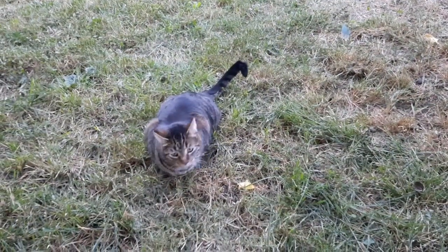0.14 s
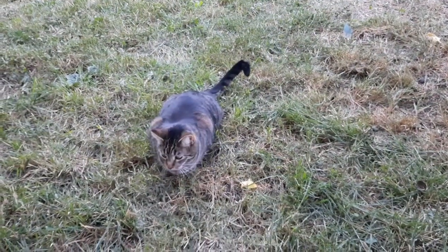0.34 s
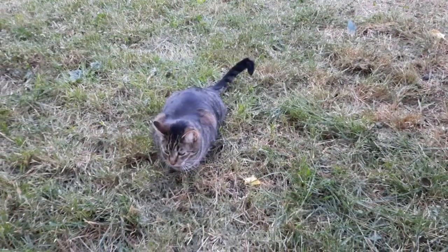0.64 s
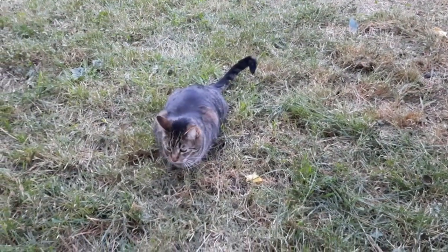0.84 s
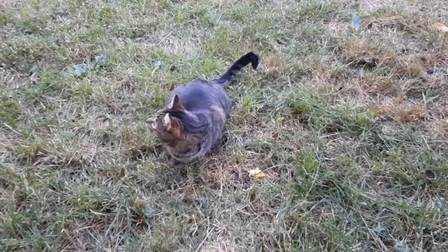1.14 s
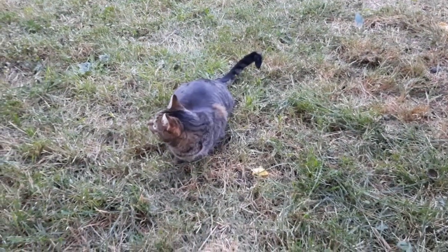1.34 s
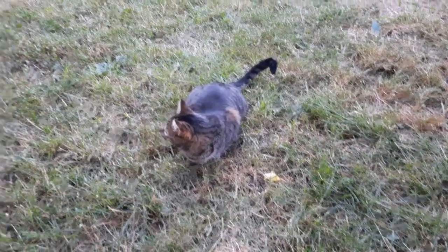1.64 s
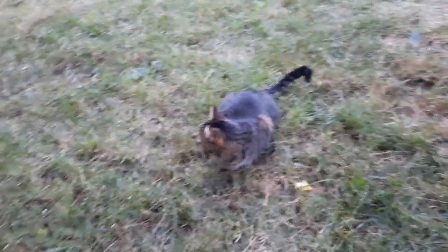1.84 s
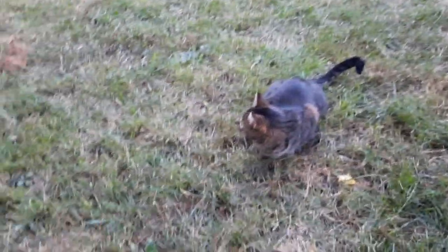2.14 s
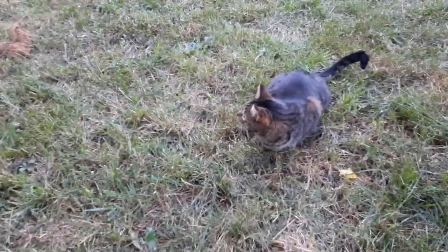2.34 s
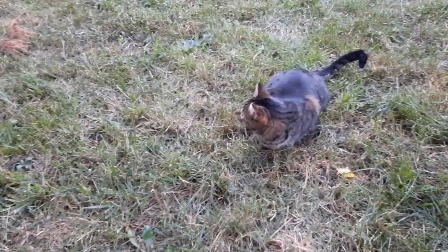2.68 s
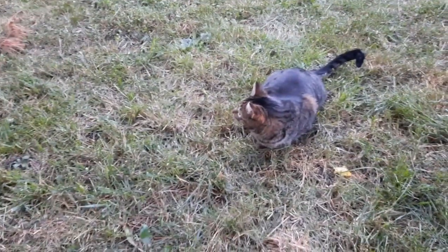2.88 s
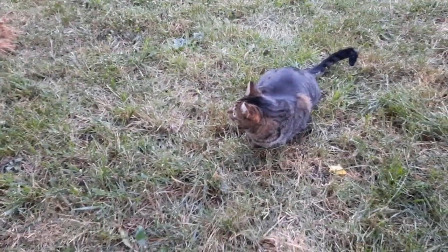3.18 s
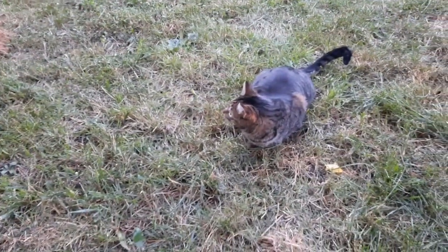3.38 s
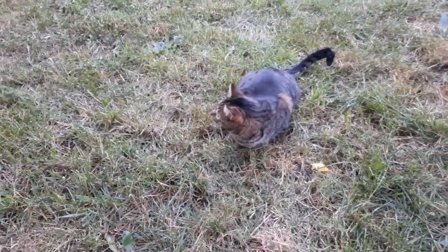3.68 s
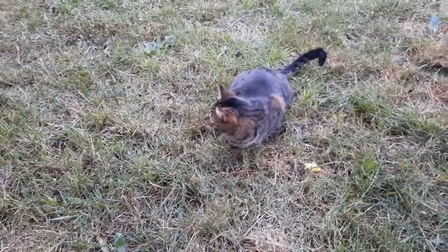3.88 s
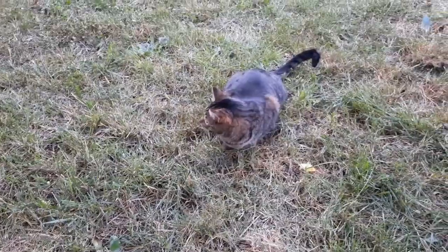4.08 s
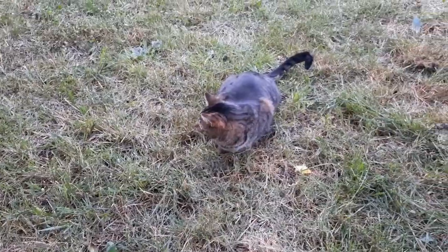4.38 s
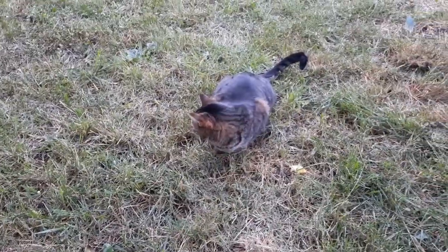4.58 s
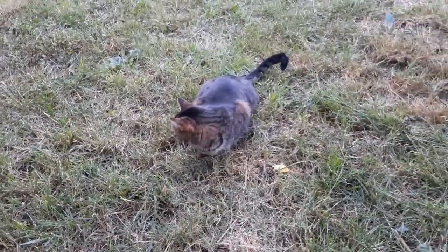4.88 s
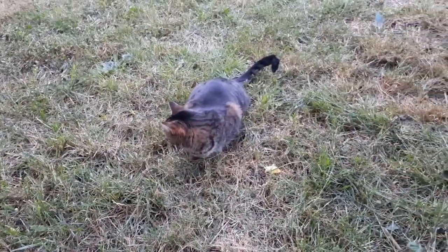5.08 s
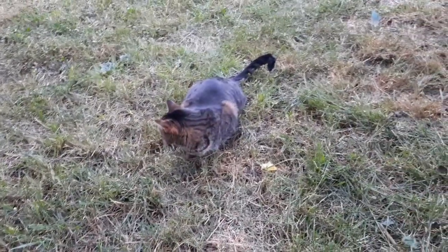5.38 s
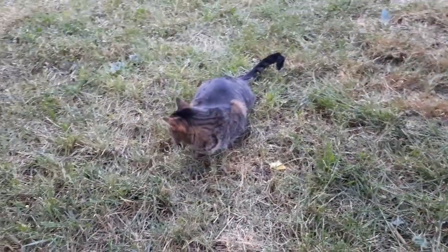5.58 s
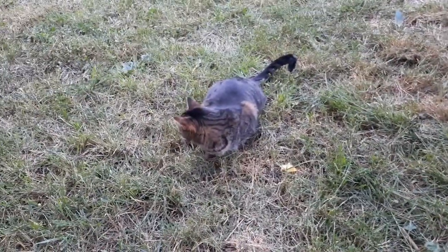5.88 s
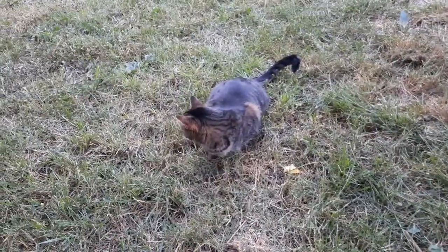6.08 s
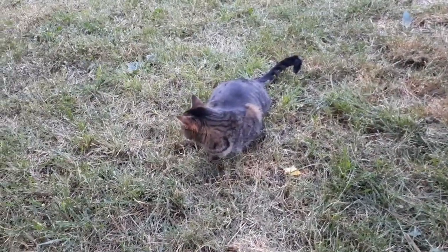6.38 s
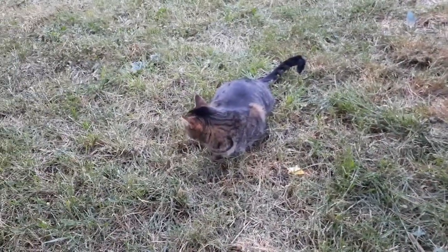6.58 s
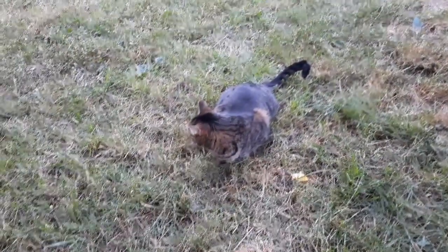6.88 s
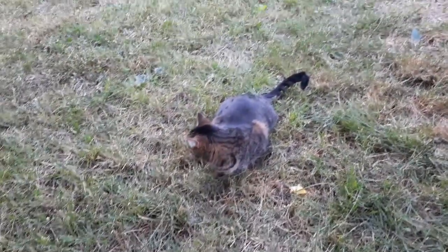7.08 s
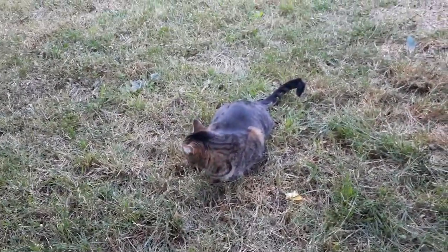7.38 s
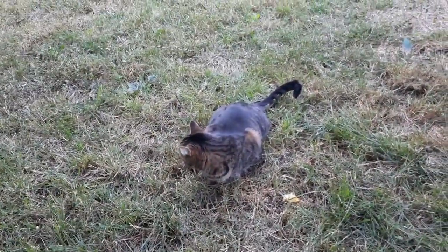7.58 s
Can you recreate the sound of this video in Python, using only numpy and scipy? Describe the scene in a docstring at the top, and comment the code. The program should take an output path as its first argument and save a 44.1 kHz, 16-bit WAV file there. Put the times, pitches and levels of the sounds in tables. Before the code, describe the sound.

Unbroken high insect trilling outdoors, one loud bird chip early then fainter ones, with distant road noise and a soft motor hum beneath.

```python
"""Ground crickets trill without pause from the outset, on a lawn in late summer: pulsed gliding tones.
A small bird nearby gives six sharp chips, upward whistles that the yard scatters back as decaying noise.
Two field crickets chirp further off, tree crickets hold thin tones and far crickets blend into a band
of noise; a far bird twitters in falling notes and dry grass rustles as clumps of random clicks.
Beneath lie the shaped noise of distant traffic and the swelling sine and narrow-band drones of a machine."""
import sys
import numpy as np
from scipy import signal
from scipy.fft import rfft, irfft
from scipy.io import wavfile
from scipy.ndimage import uniform_filter1d

SR = 44100
rng = np.random.default_rng(int(sys.argv[2]) if len(sys.argv) > 2 else 0)


def unload_wav(signal):
    """Save mono or channel-first audio to the path in sys.argv[1] as 16-bit WAV at rate SR, clipped to [-1, 1]."""
    wavfile.write(
        sys.argv[1],
        SR,
        np.round(np.clip(np.atleast_2d(signal).T, -1, 1) * 32767).astype(np.int16),
    )


N = 340893
T = np.arange(N) / SR


def gain_of(db):
    """Level law: decibels to an amplitude factor."""
    return 10 ** (np.asarray(db) / 20)


def evened(x):
    """Normalisation: a signal scaled to rms 1."""
    return x / np.sqrt(np.mean(x ** 2) + 1e-20)


def read(points, hz):
    """Interpolation: a table of (f/Hz, value) joined on a log-frequency axis."""
    f, value = np.transpose(points)
    return np.interp(np.log(hz + 1), np.log(f + 1), value)


def add(mix, s, sound):
    """Superposition: a sound is added to the mix at s seconds, cut at the ends of the mix."""
    start = round(s * SR)
    sound = sound[..., max(-start, 0):]
    part = mix[..., max(start, 0):][..., :sound.shape[-1]]
    part += sound[..., :part.shape[-1]]


def drift(width_hz):
    """Low-passed noise of rms 1: a Gaussian roll-off leaves only slow random change."""
    f = np.fft.rfftfreq(N, 1 / SR)
    spectrum = rfft(rng.standard_normal(N)) * np.exp(-(f / width_hz) ** 2)
    return evened(irfft(spectrum, N))


def flutter(length, size):
    """Smoothed noise of rms 1: a bell-shaped average over size samples gives a quick tremble."""
    return evened(signal.oaconvolve(rng.standard_normal(length), np.hanning(size), "same"))


def phase_of(hz):
    """Frequency modulation: phase is the running integral of the pitch curve."""
    return 2 * np.pi * np.cumsum(hz) / SR


def place(x, side_db):
    """Level difference between ports: positive side_db favours the left."""
    return x * gain_of([[side_db / 2], [-side_db / 2]])


def bouts(rows, rest_db, ramp_s):
    """Envelope in dB: it ramps up about each start, holds, and ramps back to rest about each end."""
    level_db = rest_db
    for start, end, db in rows:
        share = np.clip(np.minimum(T - start, end - T) / ramp_s + .5, 0, 1)
        level_db = level_db + (db - rest_db) * share
    return level_db


# decay of the yard's scattered sound: (f/Hz, 60 dB decay time/s)
YARD = [(3000, 0.35), (5500, 0.56), (7500, 0.48), (12000, 0.38), (15000, 0.37)]


def yard(early_db=1.0, early_s=0.0091):
    """Multiple scattering from leaves, fence and walls: sparse taps, a first flurry, a tail dying by band."""
    size = SR // 2
    taps = rng.standard_normal((2, size)) * (rng.random((2, size)) < .12)
    hz, t, z = signal.stft(taps, SR, nperseg=256)
    decay = gain_of(-60 * t / read(YARD, hz)[:, None])
    tail = signal.istft(z * decay, SR, nperseg=256)[1][:, :size]
    t = np.arange(size) / SR
    flurry = 1 + gain_of(early_db) * np.exp(-t / early_s)
    tail = tail * flurry * np.minimum(t / 0.0035, 1)
    return tail / np.linalg.norm(tail, axis=1, keepdims=True)


def echo(x, tail):
    """Convolution: one sound passes through a two-channel tail."""
    return signal.oaconvolve(x[None], tail, axes=1)


# near bird, one row a chip: (t/s at its loudest, level/dB, start f/Hz, top f/Hz, left minus right/dB,
# echo level re chip/dB, overtone level/dB before it thins with the climb)
CHIPS = [(0.498, -12.5, 5200, 7530, -1.5, -5, -16.5), (1.1812, -23.5, 5270, 7400, -1, 3.5, -16),
         (2.161, -31.5, 5280, 7490, -8, 8.5, -16.5), (3.1142, -31.5, 5530, 7760, -6, 9.5, -19),
         (3.982, -29, 5530, 7730, 1, 8, -19.5), (6.491, -30.5, 5450, 7640, -3, 12, -17)]
CHIP_RASP = .018  # rms tremble of the pitch, as a share


def near_bird(rise_s=0.0016, fall_s=0.00078, lead_s=0.0058, beaming_db=1.5):
    """Rapid frequency sweep: each chip is a whistle that shoots upward in milliseconds, swelling as it goes."""
    out, t = np.zeros((2, N)), np.arange(-400, 200) / SR
    for s, db, start_hz, top_hz, side_db, echo_db, overtone_db in CHIPS:
        climb = np.interp(t, [-lead_s, -lead_s / 2, .001], [0, .55, 1])
        pitch = start_hz + (top_hz - start_hz) * climb
        phase = phase_of(pitch * (1 + CHIP_RASP * flutter(len(t), size=70)))
        onset = np.clip((t + lead_s) / 0.001, 0, 1)
        gate = gain_of(db) * onset * np.exp(-(np.maximum(t, 0) / fall_s) ** 2)
        whistle = gate * (0.14 + np.exp(np.minimum(t, 0) / rise_s)) * np.sin(phase)
        overtone = gate * gain_of(overtone_db) * (1 - 0.38 * climb) * np.sin(2 * phase)
        # the direct sound holds a little more overtone than the echo
        direct = whistle + gain_of(beaming_db) * overtone
        scattered = echo(whistle + overtone, yard(early_db=-7.0, early_s=0.017))
        add(out, s + t[0], place(direct, side_db))
        add(out, s + t[0], gain_of(echo_db) * scattered)
    return out


def strokes(per_s, duty, jitter=0.015):
    """Amplitude modulation by wing strokes: loudness of each, and the scraper's run along the file (0-1)."""
    turns = np.cumsum(per_s * (1 + jitter * drift(9))) / SR + rng.random()
    run = np.minimum(turns % 1 / duty, 1)
    return np.sin(np.pi * run), run


def trill(hz, per_s, duty, sag, jitter):
    """Stridulation: an unbroken trill; within every stroke the pitch sags as the wing slows."""
    loud, run = strokes(per_s, duty, jitter)
    phase = phase_of(hz * (1 + sag * (.5 - run) + 0.00401 * drift(297)))
    return evened(loud * gain_of(2.4 * drift(16)) * np.sin(phase))


# ground crickets further off: (f/Hz, wing strokes per s, level/dB)
TRILLERS = [(7280, 38, -65.5), (7780, 55, -62), (7970, 110, -66.5), (8500, 42, -75)]
NEAR_DB, NEAR_WANDER_DB = -62.5, 0.4  # nearest cricket: direct level, and its slow rms change


def ground_crickets(echo_db=-3.0):
    """Direct against scattered sound: the near cricket's strokes stand out, the yard blurs the others."""
    near = trill(hz=7560, per_s=50.62, duty=.55, sag=.07, jitter=.002)
    near = near * gain_of(NEAR_DB + NEAR_WANDER_DB * drift(1))
    out = near + gain_of(echo_db) * echo(near, yard())[:, :N]
    for hz, per_s, db in TRILLERS:
        song = trill(hz, per_s, duty=0.61, sag=.06, jitter=.006)
        out += gain_of(db) * evened(song + 0.84 * echo(song, yard())[:, :N])
    return out


def chirp_times(first_s, tempo):
    """Integrated rate: one chirp for every beat of the tempo."""
    beats = np.cumsum(np.interp(T, *np.transpose(tempo))) / SR
    return np.interp(np.arange(np.interp(first_s, T, beats), beats[-1]), beats, T)


CHIRP_SLIP_S, CHIRP_SPREAD_DB = .01, .8  # rms scatter of timing and of level


def field_cricket(times, hz, db, length_s, per_s, overtone_db):
    """Gated stridulation: chirps of a few strokes, varied in time and level, blurred by scattering."""
    gate = np.zeros(N)
    for s, (slip, strength) in zip(times, rng.standard_normal((len(times), 2))):
        chirp = gain_of(CHIRP_SPREAD_DB * strength) * signal.windows.tukey(int(length_s * SR), .5)
        add(gate, s + CHIRP_SLIP_S * slip - length_s * 0.62, chirp)
    loud, run = strokes(per_s, .6)
    phase = phase_of(hz * (1 + .05 * (.5 - run) + .016 * drift(314)))
    song = gate * loud * (np.sin(phase) + gain_of(overtone_db) * np.sin(3 * phase))
    return gain_of(db) * evened(echo(song, yard())[:, :N])


# tempo of the higher and of the lower field cricket: (t/s, chirps per s)
HIGH_TEMPO = [(0, 2.25)]
LOW_TEMPO = [(.5, 1.93), (.7, 2.43), (4.8, 2.42), (5.2, 2.68)]
HIGH_FIRST_S, LOW_FIRST_S = .06, .09  # first beat of each


def field_crickets():
    """Independent oscillators: two crickets each keep their own time."""
    high = field_cricket(chirp_times(HIGH_FIRST_S, HIGH_TEMPO), hz=4725, db=-77.5,
                         length_s=0.14, per_s=26, overtone_db=-18)
    low = field_cricket(chirp_times(LOW_FIRST_S, LOW_TEMPO), hz=4626, db=-76,
                        length_s=0.28, per_s=27, overtone_db=-34)
    return high + low


def tree_cricket(hz, per_s, db, depth=0.79, waver=0.003514, wet=1.0):
    """Partial amplitude modulation: a far, nearly pure trill with as much echo as direct sound."""
    loud, run = strokes(per_s, 1.0)
    song = evened((1 - depth + depth * loud) * np.sin(phase_of(hz * (1 + waver * drift(24.8)))))
    return gain_of(db) * evened(song + wet * evened(echo(song, yard())[:, :N]))


# steady tree crickets: (f/Hz, wing strokes per s, level/dB)
TREE_CRICKETS = [(2791, 58, -81), (3400, 41, -93.5), (4720, 84, -87)]
# bouts of the lowest tree cricket: (start t/s, end t/s, level/dB)
TREE_BOUTS = [(.7, 5.42, -77), (7.0, 7.7, -80)]


def tree_crickets():
    """Superposed tones: steady singers, and a lowest one that sings in bouts."""
    steady = sum(tree_cricket(*row) for row in TREE_CRICKETS)
    return steady + tree_cricket(1934, 42, bouts(TREE_BOUTS, rest_db=-96, ramp_s=0.79))


# far bird, one row a twitter: (t/s at the middle of its first note, length/s, level/dB of each note's peak
# before the echo)
TWITTERS = [(0.037, .08, -65), (.33, .14, -66.5), (0.646, .08, -63.5), (2.35, .08, -70), (4.72, .03, -63.5),
            (5.68, .14, -64), (6.342, .14, -64), (7.18, .14, -65)]
NOTE_GAP_S, FIRST_NOTE_HZ, LATER_NOTES_HZ = .055, 4040, 3407  # a twitter opens high, then drops


def far_bird(length_s=0.06, fall=0.052, husk=0.0517):
    """Reverberant field: twitters of short, husky falling notes, heard only as echo."""
    t, out = np.arange(0, length_s, 1 / SR), np.zeros(N)
    for s, twitter_s, db in TWITTERS:
        for after_s in np.arange(0, twitter_s, NOTE_GAP_S):
            hz = LATER_NOTES_HZ if after_s else FIRST_NOTE_HZ
            glide = fall * (.5 - t / length_s)
            phase = phase_of(hz * (1 + glide + husk * flutter(len(t), size=150)))
            note = gain_of(db) * np.hanning(len(t)) * np.sin(phase)
            add(out, s + after_s - length_s / 2, note)
    return echo(out, yard(early_db=0.0, early_s=0.012))[:, :N]


# brief dry rustles in the grass: (t/s at the middle, length/s, level/dB at the middle)
RUSTLES = [(4.68, .3, -70), (5.6, .14, -68)]


def rustles(per_s=3000):
    """Random impulses: dry blades of grass brush together in brief clumps of high-passed snaps."""
    gate = sum(gain_of(db) * np.exp(-(2 * (T - s) / length) ** 2) for s, length, db in RUSTLES)
    snaps = rng.standard_normal((2, N)) * (rng.random(N) < per_s / SR)
    high_pass = signal.butter(2, 4000, "high", fs=SR, output="sos")
    return gate * evened(signal.sosfilt(high_pass, snaps))


def wash(spectrum, likeness, lead, swell_db, patchy_db):
    """Partly coherent diffuse noise at two ports, rms 1; swell_db(t, hz) shapes it over time."""
    hz, t = np.fft.rfftfreq(2048, 1 / SR), np.arange(N // 512 + 5) * 512 / SR
    a, b, c, d, patches = rng.standard_normal((5, len(t), len(hz)))
    patches = uniform_filter1d(patches, size=8, axis=0)
    patches = evened(uniform_filter1d(patches, size=14, axis=1))
    same = np.clip(read(likeness, hz), -1, 1)
    left = a + 1j * b
    right = same * left + np.sqrt(1 - same ** 2) * (c + 1j * d)
    z = np.array([left * np.exp(1j * read(lead, hz)), right])
    z *= gain_of(read(spectrum, hz) + swell_db(t[:, None], hz) + patchy_db * patches)
    return evened(signal.istft(z.swapaxes(1, 2), nperseg=2048, noverlap=1536)[1][:, :N])


# spectrum of the far crickets: (f/Hz, relative level per Hz/dB)
CHORUS = [(6300, -37), (6900, -3.5), (7400, -4), (8100, 4), (8500, -3.5), (9100, -21), (10000, -35),
          (14000, -29), (15200, -18.5), (16000, -19)]
CHORUS_DB = -58.5


def far_chorus():
    """Incoherent summation: far crickets blend into steady, slightly patchy noise."""
    noise = wash(CHORUS, [(7500, .1)], [(0, 0)], lambda t, hz: 0, patchy_db=1.15)
    return gain_of(CHORUS_DB) * noise


# swell of the traffic, each level heard relative to its column's mean: (t/s, rumble level/dB,
# tyre roar level/dB)
TRAFFIC = [(0, -64, -67.5), (.25, -52, -64.5), (1.5, -66, -63.5), (1.8, -66, -65.5), (2.7, -56, -66),
           (4.25, -62, -65.5), (4.55, -53.5, -67.5), (7.73, -59.5, -66)]
# tyres sing as vehicles pass on a far road: (t/s when nearest, half length/s, f/Hz, level above the roar/dB)
PASSES = [(.3, 1.1, 896, 7), (5.9, 1, 627, 4.5)]


def traffic_swell(t, hz, sing_width_hz=110):
    """Time-varying spectrum: rumble and roar swell in their own ranges; passing tyres sing in a narrow band."""
    s, rumble_db, roar_db = np.transpose(TRAFFIC)
    rumble_share = read([(100, 0.44), (250, 0.015)], hz)
    roar_share = read([(150, 0.9), (400, 0.67), (1400, 0.064), (3500, 0)], hz)
    rumble = np.interp(t, s, rumble_db - rumble_db.mean()) * rumble_share
    roar = np.interp(t, s, roar_db - roar_db.mean()) * roar_share
    tyres = sum(db * np.exp(-((t - nearest_s) / half_s) ** 2 - ((hz - tyre_hz) / sing_width_hz) ** 2)
                for nearest_s, half_s, tyre_hz, db in PASSES)
    return rumble + roar + tyres


# spectrum of traffic and air: (f/Hz, relative level per Hz/dB)
AIR = [(20, -36), (36, -28), (54, 1), (85, -2), (135, -4), (220, -8), (370, -9), (620, -20), (1300, -26),
       (2300, -31.5), (3800, -36.5), (5600, -28), (9600, -38), (15500, -51)]
# likeness of the two channels: (f/Hz, coherence 0-1)
AIR_SAME = [(60, 0.93), (130, 0.81), (290, 0.54), (640, 0.19), (1400, 0.46), (3100, 0.22), (6000, 0.053)]
# phase by which the left channel leads: (f/Hz, phase/rad)
AIR_LEAD = [(100, 0.5), (260, 0.09), (700, -2), (1300, -3.5), (1890, -5.5), (2840, -6.5), (4050, -11.5)]
AIR_DB = -53


def traffic_and_air():
    """Diffuse field: broadband noise, more alike at the two ports in the bass, swells with the traffic."""
    return gain_of(AIR_DB) * wash(AIR, AIR_SAME, AIR_LEAD, traffic_swell, patchy_db=1.74)


# long swells of the machine's hum: (start t/s, end t/s, level/dB)
HUM_SWELLS = [(.05, 1.35, -55), (2.52, 4.05, -54.5), (4.85, 6.45, -56.5), (7.05, 7.9, -55.5)]
# drones of the machine's housing: (f/Hz, half width/Hz, level/dB)
DRONES = [(236.2, 4.1, -74), (300.8, 13.6, -65), (341.5, 29, -66), (402.6, 14, -86)]
HUM_REST_DB, HUM_RAMP_S = -68, 0.39  # level between swells, and how long the hum takes to come or go


def machine(hz=116.4):
    """Tone and narrow-band noise: a motor hum that comes and goes, with the drone of its housing."""
    level_db = bouts(HUM_SWELLS, HUM_REST_DB, HUM_RAMP_S) + 1.7 * drift(9)
    hum = np.sqrt(2) * gain_of(level_db) * np.sin(phase_of(hz * (1 + 0.0144 * drift(5.84))))
    drones = np.zeros(N)
    for f, width, db in DRONES:
        turn = 2 * np.pi * f * T
        drones += gain_of(db) * (drift(width) * np.cos(turn) + drift(width) * np.sin(turn))
    return place(hum + drones, -0.56)


def scene():
    """Superposition: insects, birds, grass, traffic and hum together on the lawn."""
    birds = near_bird() + far_bird()
    insects = ground_crickets() + field_crickets() + tree_crickets() + far_chorus()
    return birds + insects + rustles() + traffic_and_air() + machine()


# colour of the two microphone ports: (f/Hz, gain/dB)
LEFT_PORT = [(400, -.5), (1200, 3), (4700, 0.5), (5800, -3.5), (7300, -5.5), (8300, -2), (9600, -6),
             (11500, 0.5)]
RIGHT_PORT = [(400, 0), (1200, -2), (4700, -1.5), (5800, 0), (7400, -1.5), (8200, -9), (8500, -12),
              (9600, -15), (11500, -11.5)]
ONE_PORT_HZ, ONE_PORT_SHARE = 7560, .85  # about and above here, the left port's power share in the right channel
EDGE_HZ = 15780  # band limit


def record(dry, hiss_db=-78.0, right_hiss_db=-78.0):
    """Linear filtering: shared treble, port colour and low cut, with hiss, then the band limit."""
    hz = np.fft.rfftfreq(N, 1 / SR)
    left, right = rfft(dry + gain_of(hiss_db) * rng.standard_normal((2, N)))
    shared = np.clip((hz - ONE_PORT_HZ) / 200 + .5, 0, ONE_PORT_SHARE)
    right = np.sqrt(1 - shared) * right + np.sqrt(shared) * left
    low_cut = 1 - np.exp(-(hz / 41) ** 4)
    ports = gain_of([read(LEFT_PORT, hz), read(RIGHT_PORT, hz)]) * low_cut
    coloured = irfft(np.array([left, right]) * ports, N)
    # the right channel gets a second hiss, untouched by its port's colour
    coloured[1] += gain_of(right_hiss_db) * rng.standard_normal(N)
    band_limit = signal.firwin(511, EDGE_HZ, window=("kaiser", 9), fs=SR)
    return signal.oaconvolve(coloured, band_limit[None], "same")


dry = scene()
out = record(dry)
unload_wav(out)
```